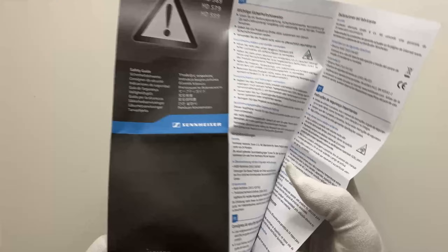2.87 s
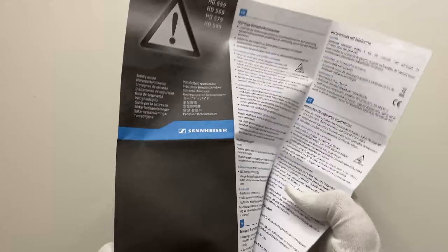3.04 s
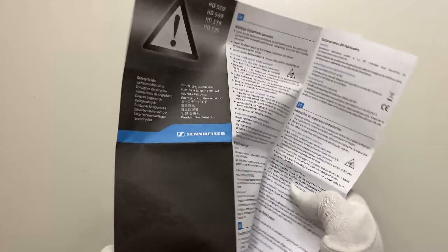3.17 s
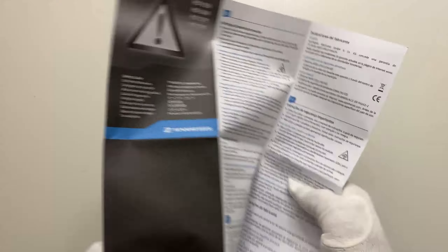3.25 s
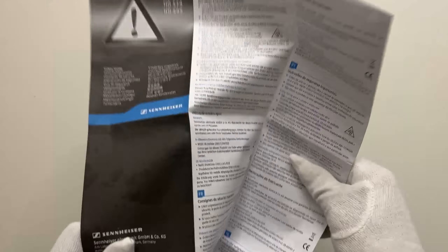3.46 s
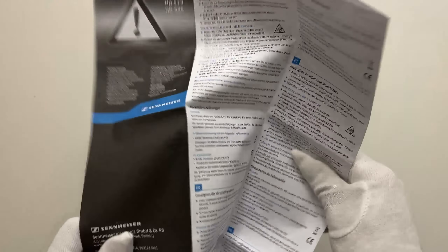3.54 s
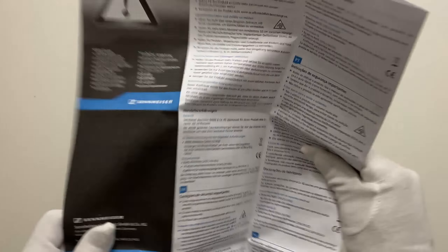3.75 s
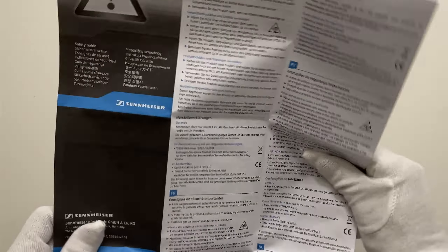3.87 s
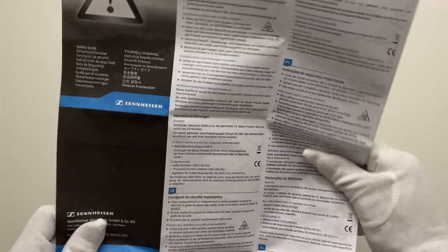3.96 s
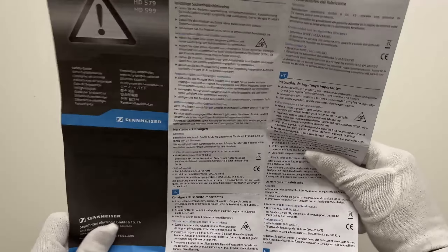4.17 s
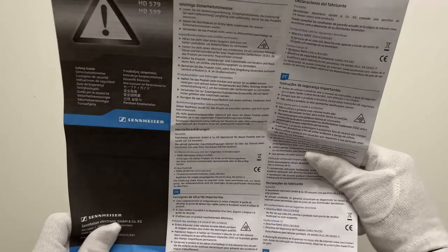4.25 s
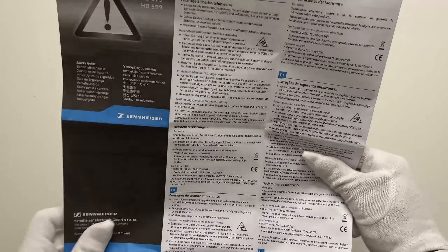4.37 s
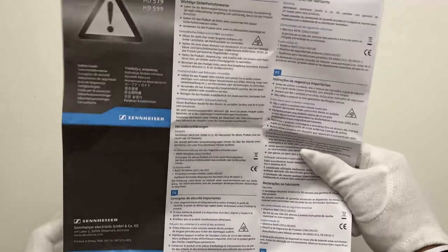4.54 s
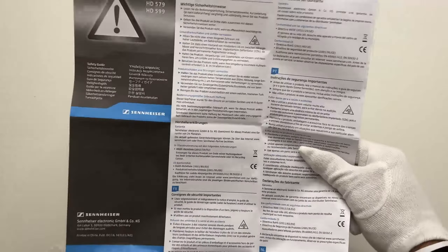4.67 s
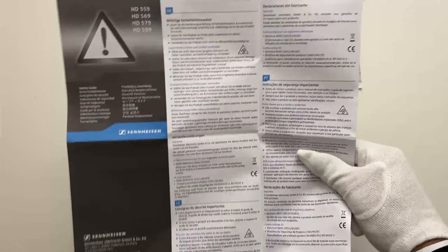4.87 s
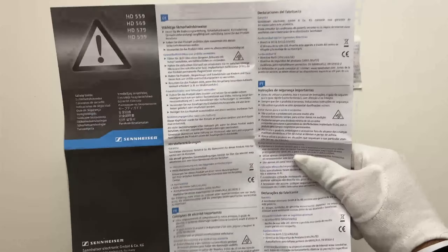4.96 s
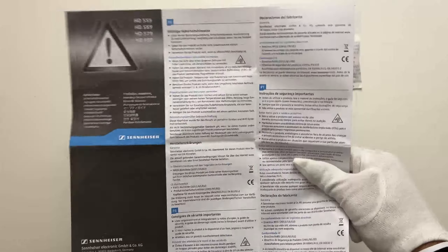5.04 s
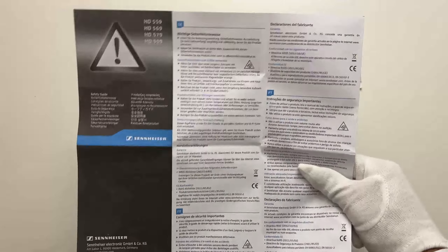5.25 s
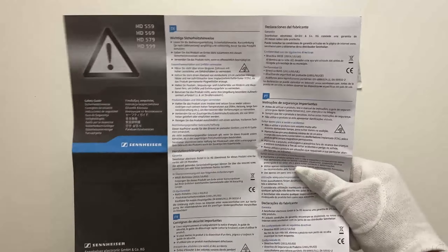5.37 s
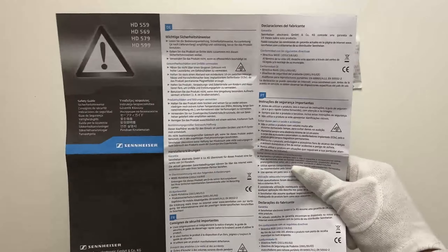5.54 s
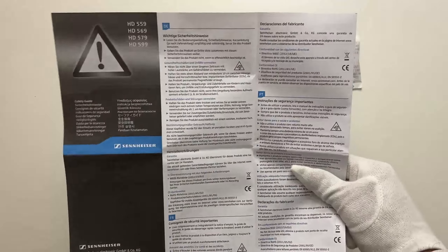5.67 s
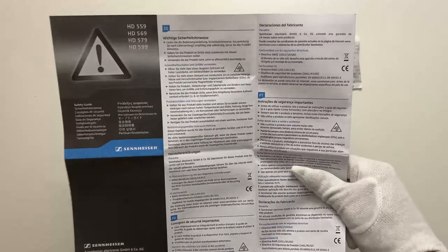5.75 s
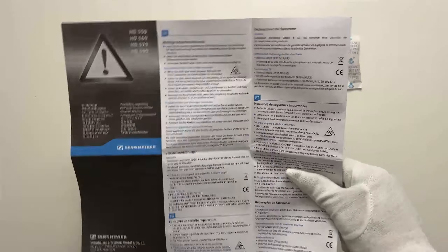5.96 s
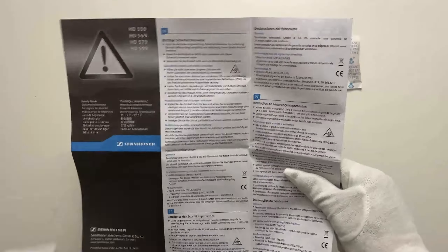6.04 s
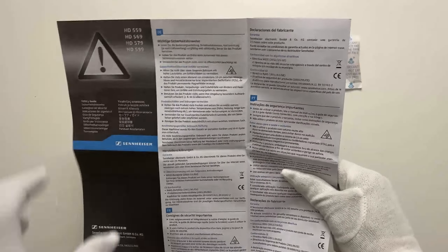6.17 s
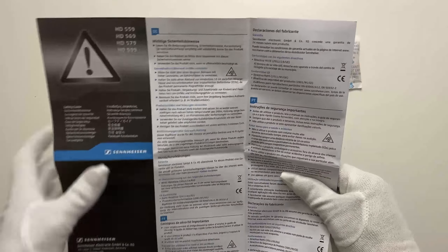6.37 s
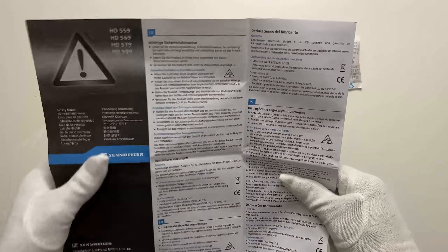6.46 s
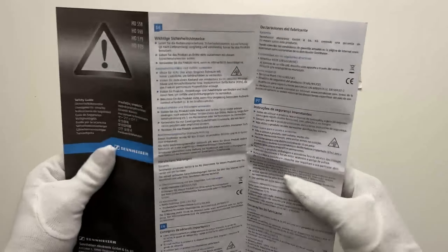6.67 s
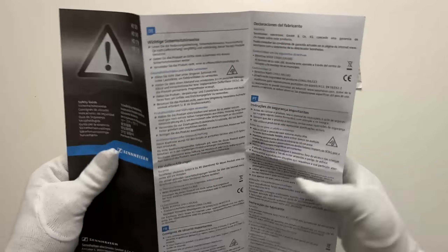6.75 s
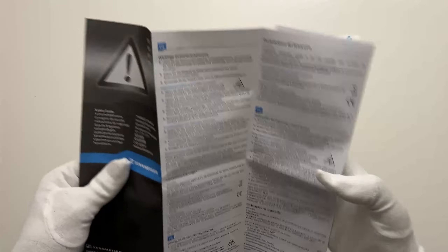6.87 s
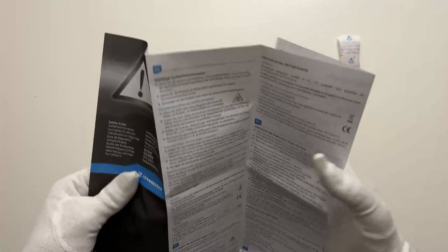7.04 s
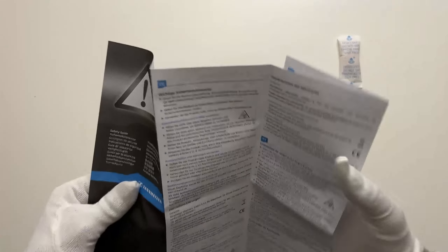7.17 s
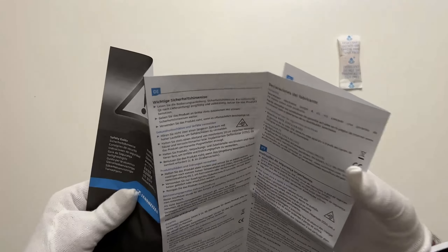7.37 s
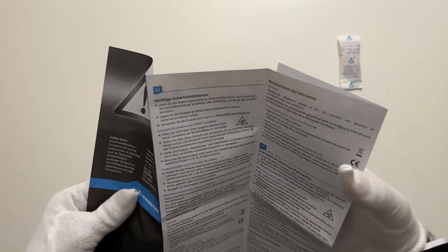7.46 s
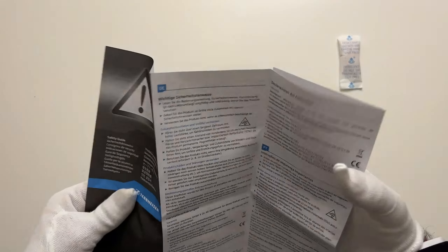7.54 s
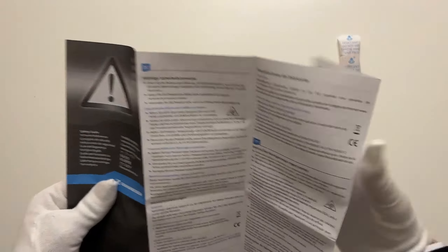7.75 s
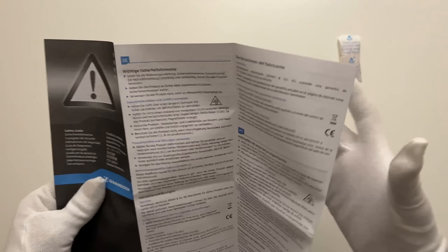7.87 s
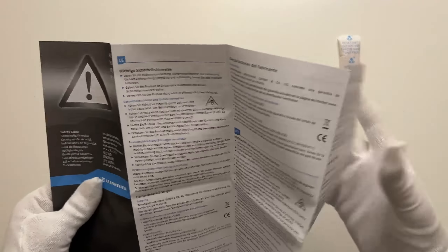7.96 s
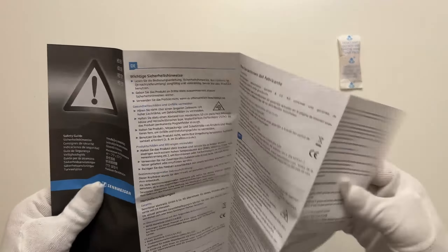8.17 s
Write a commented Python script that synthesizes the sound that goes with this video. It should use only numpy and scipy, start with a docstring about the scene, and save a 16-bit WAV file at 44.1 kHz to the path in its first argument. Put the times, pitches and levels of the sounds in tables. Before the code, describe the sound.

A folded paper leaflet is opened by gloved hands, close to the microphone in a quiet room. It starts with a quick burst of crisp crease snaps, followed by lighter crackling, flapping and the hiss of cotton fingertips, with sharper snaps around 0.9, 1.7 and 2.6 seconds. From about 3 to 5 seconds the paper crinkles densely, loudest near 3.7 seconds, each snap carrying a papery knock and a bright crack. The handling then thins out, with small rustles near 5.8 and 6.5 seconds, soft thumps of the bending sheet around 7 seconds and a brief lull. Crackling returns at 7.6 seconds and swells into a loud run of snaps from 8.3 to 8.9 seconds, with a few more around 9.5 seconds. Slight room reverberation follows the snaps, and a faint low hum continues throughout.

```python
"""A folded paper leaflet is opened by gloved hands, close up in a quiet room.
Its creases snap in volleys of tiny buckles, each with a papery knock, a bright crack and a drumming
of the sheet. Between snaps the paper crackles and flaps, cotton fingertips hiss across it and soft
pushes make it thump. The room answers the snaps and hums faintly underneath."""
import sys
import numpy as np
from scipy import signal
from scipy.fft import rfft, irfft, next_fast_len
from scipy.io import wavfile
from scipy.ndimage import uniform_filter1d, map_coordinates

SR = 44100
rng = np.random.default_rng(int(sys.argv[2]) if len(sys.argv) > 2 else 0)


def pcm_store(signal):
    """Save signal as 16-bit PCM."""
    levels = np.round(np.clip(np.atleast_2d(signal), -1, 1) * 32767)
    wavfile.write(sys.argv[1], SR, levels.astype(np.int16).T)


N = 428211


def amp(db):
    return 10 ** (np.asarray(db) / 20)


def unit_rms(x):
    return x / np.sqrt(np.mean(x ** 2, axis=-1, keepdims=True) + 1e-20)


def unit_peak(x):
    return x / (np.abs(x).max() + 1e-12)


def decay(t, t60):
    return amp(-60 * t / t60)


def attack(t, rise_s):
    return (1 - np.exp(-t / rise_s)) ** 2


def along(points, hz):
    """Read a curve of (Hz, value) points on a log frequency axis."""
    knots_hz, values = np.transpose(points)
    return np.interp(np.log(hz + 1), np.log(knots_hz + 1), values)


def filtered(x, response):
    """Pass x through a complex frequency response."""
    n = x.shape[-1]
    padded = next_fast_len(n + 4096)
    return irfft(rfft(x, padded) * response(np.fft.rfftfreq(padded, 1 / SR)), padded)[..., :n]


def eq(points):
    """The response of a (Hz, dB) curve."""
    return lambda hz: amp(along(points, hz))


def resonance(hz, centre_hz, width_hz):
    return 1j * hz * width_hz / (centre_hz ** 2 - hz ** 2 + 1j * hz * width_hz)


def lowpass(hz, corner_hz):
    return 1 / (1 + 1j * hz / corner_hz)


def wobble(rate):
    """A smooth random curve with `rate` knots a second."""
    return map_coordinates(rng.standard_normal(int(N * rate / SR) + 4), [np.arange(N) * rate / SR])


def patchy_noise(depth_db):
    """Noise whose colour drifts in random patches of time and pitch."""
    spectrum = signal.stft(rng.standard_normal(N), nperseg=512)[2]
    patches = uniform_filter1d(rng.standard_normal(spectrum.shape), size=20, axis=0)
    patches = uniform_filter1d(patches, size=12, axis=1)
    return signal.istft(spectrum * amp(depth_db * patches / patches.std()), nperseg=512)[1][:N]


# Dark bed of room air: (frequency [Hz], gain [dB])
AIR_EQ = [(15, -28), (33, -4.5), (48, 13.5), (146, 6.5), (252, 2), (445, -7.5), (750, -16), (1200, -24),
          (2460, -17.5), (5130, -27.5), (6380, -23.5), (11600, -48.5), (13300, -54), (16500, -48.5)]
# Low hum bands: (pitch [Hz], resonance width [Hz], level [dB])
HUM_BANDS = [(47.7, 8.3, -67), (101, 17, -74), (145.76, 5.2, -67)]


def room_tone():
    """Faint air, with a hum that wavers because it is made of narrow bands of noise."""
    air = amp(-67) * unit_rms(filtered(rng.standard_normal((2, N)), eq(AIR_EQ)))
    for pitch_hz, width_hz, db in HUM_BANDS:
        hum = filtered(rng.standard_normal((2, N)), lambda hz: resonance(hz, pitch_hz, width_hz) ** 2)
        air += amp(db) * unit_rms(hum)
    return air


# Glove strokes: (time [s], hold [s], crackle level [dB], flap level [dB], hiss level [dB])
GLOVE_SLIDES = [(0.0, 0.031, -55, -52, -64), (0.023, 0.43, -84, -65, -61), (0.5, 0.085, -68, -67, -63),
                (0.814, 0.016, -61, -64, -64), (0.93, 0.086, -60, -54, -57.5),
                (1.05, 0.13, -66.5, -60.5, -56), (1.311, 0.1, -58, -57.5, -59),
                (1.51, 0.1, -58, -66, -60.5), (1.62, 0.09, -53, -57, -68), (1.731, 0.013, -68, -56, -44),
                (2.114, 0.098, -70, -61, -64.5), (2.312, 0.11, -78, -58, -60.5),
                (2.76, 0.033, -61, -57.5, -74), (3.047, 0.07, -72, -76, -66.5),
                (3.147, 0.11, -53, -60, -59.5), (3.338, 0.31, -66, -62.5, -61.5),
                (3.6, 0.023, -44, -72, -61), (3.68, .04, -40.5, -44, -60), (3.753, 0.035, -45, -55, -67.5),
                (3.847, 0.019, -45.5, -63, -57.5), (4.01, 0.033, -55, -50, -53.5),
                (4.277, 0.32, -66, -72, -62.5), (4.752, 0.027, -58, -60, -51),
                (4.902, 0.12, -48.5, -56, -53), (5.164, 0.066, -60.5, -75, -62.5),
                (5.693, 0.048, -63.5, -63, -64.5), (5.921, 0.22, -70.5, -68, -70),
                (6.377, 0.17, -74, -73.5, -73), (6.545, 0.097, -49.5, -55, -64),
                (6.7, 0.051, -61, -60, -65.5), (6.909, 0.17, -67.5, -61, -74.5),
                (7.15, 0.029, -77.5, -76, -70.5), (7.41, .02, -89.5, -81, -80), (7.48, .03, -89, -85, -76),
                (7.544, 0.033, -82, -71, -57.5), (7.59, 0.086, -56.5, -59, -56.5),
                (7.9, 0.19, -63.5, -60.5, -77), (8.147, 0.02, -61, -61, -61),
                (8.35, 0.047, -41.5, -39.5, -49), (8.416, 0.026, -38.5, -45, -66),
                (8.478, 0.018, -49, -52, -42), (8.764, 0.16, -53, -57.5, -58.5),
                (9.076, 0.2, -66.5, -60, -64), (9.364, 0.16, -60.5, -57, -60),
                (9.613, .1, -61, -64.5, -57.5)]


def glove_slides():
    """Power envelopes of crackle, flap and hiss: each stroke over the sheet swells, holds and fades."""
    rise_db_per_s, fall_db_per_s = 248.5, 96.5
    t = np.arange(0, N, 64) / SR
    start, hold, *levels_db = np.transpose(GLOVE_SLIDES)[:, :, None]
    fade_in_db = np.minimum(rise_db_per_s * (t - start), 0)
    fade_out_db = np.minimum(fall_db_per_s * (start + hold - t), 0)
    powers = [amp(2 * (db + fade_in_db + fade_out_db)).sum(axis=0) for db in levels_db]
    return [np.interp(np.arange(N) / SR, t, power) for power in powers]


# Dry midrange crackle of the paper: (frequency [Hz], gain [dB])
CRACKLE_EQ = [(290, -34), (500, 0), (850, 8), (914, 4), (1130, 5.5), (1590, 1.5), (1800, 3), (6000, -7.5),
              (7800, -15.5), (13200, -120)]
# Low flutter of the sheet: (frequency [Hz], gain [dB])
FLAP_EQ = [(35, -70), (60, -1), (110, -2), (174, -5), (347, 1.5), (391, -3), (427, -0.5), (800, -15),
           (1040, -41.5), (1760, -120)]
# Airy rub of cotton on paper: (frequency [Hz], gain [dB])
HISS_EQ = [(2000, -11), (3500, -9), (4250, -7), (5100, -15), (5500, -6.5), (7200, -7.5), (9700, -14),
           (12200, -17), (16500, -24.5)]


def paper_rustle():
    """Sliding or settling, the sheet crackles in clumps, flaps, and hisses under the fingertips."""
    clumps = wobble(30)
    buckles = amp(clumps + 3 * wobble(160) + 1.8 * wobble(700))
    crackle = filtered(buckles * patchy_noise(depth_db=2), eq(CRACKLE_EQ))
    flutter = amp(1.8 * clumps + 2.1 * wobble(18))
    flap = flutter * filtered(rng.standard_normal(N), eq(FLAP_EQ))
    uneven_rub = amp(1.5 * wobble(22) + 1.2 * wobble(200))
    hiss = uneven_rub * filtered(patchy_noise(depth_db=1.5), eq(HISS_EQ))
    layers = zip([crackle, flap, hiss], glove_slides(), sheet_settling())
    return sum(np.sqrt(slide + settle) * unit_rms(layer) for layer, slide, settle in layers)


def crease_knock(volley, impulse, knock_hz, rasp_db):
    """The patch around a crease knocks, rasps and rings. Returns that and a smooth-toned click."""
    bend_s = 0.000993  # bending-wave delay at 1 kHz; lower pitches arrive later
    knock = lambda hz: resonance(hz, knock_hz, 0.39 * knock_hz) ** 2

    def rasp(hz):
        return amp(rasp_db) * (resonance(hz, 0.92 * knock_hz, 2.39 * knock_hz) * lowpass(hz, 6000)) ** 2

    def patch(hz):
        bend = np.exp(-4j * np.pi * bend_s * np.sqrt(1000 * hz))
        late = np.exp(-2j * np.pi * hz * 0.00193)  # the wider patch answers late and hollow
        hollow = 0.22 * resonance(hz, 0.535 * knock_hz, 0.21 * knock_hz) ** 2 * late
        ring = amp(-5.5) * resonance(hz, knock_hz, 0.06 * knock_hz) * lowpass(hz, knock_hz)
        return bend * (knock(hz) * lowpass(hz, 3 * knock_hz) + rasp(hz) + hollow + ring)

    return filtered(volley, patch), filtered(impulse, lambda hz: knock(hz) + rasp(hz))


# Bright edge of a snap: (frequency [Hz], gain [dB])
CRACK_EQ = [(2500, -31), (4000, -22), (5200, -7), (6000, 14), (7800, 9.5), (9600, -3), (12000, -2),
            (14000, -0.5), (16500, 1)]


def crease_crack(volley, t, peak_hz, crack_db):
    """The treble of a snap dies first; a stronger crack carries more of the very top."""
    def edge(hz):
        top_db = crack_db * (hz > 9800)
        return amp(along(CRACK_EQ, hz) + top_db) * (1 + resonance(hz, peak_hz, 3200))

    return filtered(volley * attack(t, 0.00043) * decay(t, t60=0.0069), edge)


# Drum modes of the sheet: (pitch [Hz], width [Hz], gain [dB])
SHEET_MODES = [(348, 21, 2), (434.4, 21, 2), (585, 165, -3.5), (231, 57, -8), (117, 100, -10.5)]


def sheet_drum(hz):
    """Response of the whole panel: low modes of alternating polarity that shed little treble."""
    modes = sum((-1) ** k * amp(db) * resonance(hz, pitch_hz, width_hz)
                for k, (pitch_hz, width_hz, db) in enumerate(SHEET_MODES))
    return modes * lowpass(hz, 1500) ** 2


# Crease hits: (time [s], body level [dB], drum over body [dB], crack over body [dB],
# rasp over knock [dB], knock pitch [Hz], volley t60 [s])
CREASE_SNAPS = [(0.028, -24.5, -8, -5.5, 0.5, 1100, 0.074), (0.086, -23.5, -16, -8, -13.5, 1660, 0.0098),
                (0.194, -25.5, -8, -4.5, 19, 1410, 0.028), (0.275, -25, -16, -24, 9, 1490, 0.027),
                (0.278, -26, -2, -34.5, 0.5, 760, 0.03), (0.531, -37, -7, -20, -12, 1050, 0.041),
                (0.568, -54.5, 4.5, -20, -8, 1000, 0.029), (0.615, -45.5, -5, -22, 3, 1620, 0.042),
                (0.665, -51, -3, -23, -3, 1310, 0.015), (0.736, -43, -5.5, -29, 2, 930, 0.17),
                (0.84, -46, -15, -25, -5, 1070, .04), (0.918, -30, -13, -4.5, 2, 1350, 0.032),
                (1.048, -55, -9, -25, -8, 1000, .03), (1.138, -51, 0, -30, -14.5, 950, 0.047),
                (1.27, -45.5, -7, -18.5, -15, 914, 0.013), (1.325, -45.5, -3, -22.5, -17, 1630, 0.029),
                (1.368, -36, -12, -27.5, -2, 950, 0.026), (1.535, -48.5, -14, -19, -3, 1600, 0.027),
                (1.564, -43, -21, -13, 1.5, 1750, 0.034), (1.626, -29.5, -14.5, -7.5, 2, 1830, 0.038),
                (1.639, -29, -8, -12, -8, 1740, 0.051), (1.703, -19, -39, -7, 9, 4130, 0.0067),
                (1.743, -22, -51, -26, -3, 1510, 0.014), (1.931, -43.5, -3.5, -17, -13, 1230, 0.019),
                (2.066, -42, -6, -4, 16, 890, 0.072), (2.094, -45.5, -3, -27, 3, 1050, 0.03),
                (2.137, -29.5, -17.5, -35, -4, 2110, 0.0078), (2.237, -27, -16.5, -46, -6, 1670, 0.0097),
                (2.254, -31.5, -5.5, -26, -29, 1840, 0.02), (2.266, -39, 2, -25, -25, 1830, 0.031),
                (2.294, -34, -11, -25, -14, 1160, 0.029), (2.355, -39.5, -2, -30, -17, 1150, 0.051),
                (2.364, -33, -17, -32, -14, 1190, 0.033), (2.414, -43, 7, -30, -9, 1040, 0.028),
                (2.427, -40.5, -2, -30, -28, 1150, 0.037), (2.641, -27, -7.5, -9.5, 12, 1120, 0.039),
                (2.8, -34.5, -7.5, -31, -4, 1660, 0.035), (2.895, -38, -11.5, -32, -17, 1300, 0.05),
                (3.123, -37, -11.5, -6.5, 7.5, 2000, 0.014), (3.129, -26, -8, 7, 16, 2460, 0.023),
                (3.144, -30.5, -8, -9, 3, 1150, 0.058), (3.149, -28.5, -21, -2.5, -1.5, 1990, 0.011),
                (3.157, -25.5, -16, -11, 12, 1280, 0.047), (3.267, -34.5, -2.5, -26.5, -3, 1280, 0.038),
                (3.296, -42, -6, -27, -10, 997, 0.033), (3.334, -30, -9, -27.5, -16.5, 1100, 0.038),
                (3.359, -42, 2.5, -29, -13.5, 1200, 0.04), (3.378, -44, 1, -30.5, -17, 1060, 0.017),
                (3.563, -18, -9, -12.5, 7, 2150, 0.034), (3.588, -23.5, -32.5, -1.5, 7, 1300, 0.023),
                (3.605, -32.5, -17, -22, 2, 2000, 0.025), (3.646, -13, -12.5, -11, 1, 2120, 0.0087),
                (3.660, -13.5, -21, -24.5, 2, 2280, 0.028), (3.687, -30.5, -12, -21.5, 3, 1700, 0.01),
                (3.719, -38.5, -20, 1, 1, 1990, .01), (3.728, -20.5, -14, 3, 2, 2750, 0.027),
                (3.786, -29, -8, -27, -9.5, 1100, .015), (3.825, -25.5, -21, -18, -11, 1117, 0.013),
                (3.850, -23.5, -10.5, -32.5, 29, 1400, 0.096), (3.876, -28.5, -19, -33, -6, 1280, 0.011),
                (4, -32, -7, -24, -7, 1200, 0.057), (3.99, -39.5, -1, -32, -8, 1800, 0.019),
                (4.015, -15.5, -16.5, -24, 14, 1940, 0.019), (4.027, -32, -10, -25, -16, 1250, .03),
                (4.04, -35, -3, -23, -25, 1210, 0.01), (4.059, -36, -2, -20, -16, 1290, 0.021),
                (4.087, -29, -11, -18.5, 1, 1320, 0.11), (4.099, -37.5, -10, -29, -7, 2200, 0.015),
                (4.141, -42, 0.5, -13, -21, 1480, 0.037), (4.181, -44, 0, -33, -27, 1230, 0.025),
                (4.324, -27.5, -12.5, -4.5, 2, 2250, 0.032), (4.44, -47.5, 5.5, -21, -17, 1260, 0.0087),
                (4.587, -47.5, 0, -19.5, -10, 825, 0.033), (4.721, -43, -1, -28.5, -14, 930, 0.038),
                (4.726, -36.5, -7, -26, 3, 1490, 0.034), (4.735, -52, -5, -14.5, 9, 2000, 0.034),
                (4.881, -28, -16.5, -8, 0, 1990, .02), (4.884, -18.5, -18, -23, 9, 2300, 0.031),
                (4.946, -38.5, -5.5, -20, -6, 1210, .015), (4.966, -38, 2, -29.5, -12, 795, 0.049),
                (4.978, -45.5, -1, -19, -1, 1000, .03), (5, -39, -5, -22, -6, 1800, 0.014),
                (5.015, -33, -2, -5.5, 6, 1430, 0.036), (5.028, -30.5, -3.5, -21, 5, 1210, 0.018),
                (5.040, -28, -12, -26, 6, 1380, 0.032), (5.226, -45.5, -2.5, -13, -3, 875, 0.11),
                (5.518, -68, 9.5, -10.5, -4, 933, 0.029), (5.587, -67, 15, -28, -12, 880, 0.03),
                (5.75, -40, -6.5, -30, -3, 1440, .038), (5.787, -39, -30, -25, -11, 805, 0.069),
                (5.811, -32, -11, -28, 1, 1490, 0.05), (5.954, -53, 3, -20.5, -10, 864, 0.066),
                (6.515, -30, -8, -20.5, 12, 1700, 0.087), (6.568, -30.5, -5, -31, -26, 1410, 0.042),
                (6.577, -30.5, -8, -33, 4, 1460, 0.06), (6.630, -29.5, -7, -6, -7, 1460, 0.014),
                (6.644, -36, -12, -31, -24, 1330, 0.02), (6.663, -54, -16, -29.5, -10, 1600, 0.013),
                (6.714, -44.5, 3, -33, -12, 1090, .03), (6.787, -53, -4, -24.5, -2, 2480, 0.013),
                (6.795, -39, -0.5, -16, -20, 2200, 0.03), (6.908, -54, -7, -27, -6, 2500, .02),
                (7.021, -46, 4, -26, -2, 1480, 0.018), (7.585, -34, -10, -36, 14, 1320, 0.045),
                (7.598, -35, -21, -22, 5, 2340, 0.11), (7.684, -32.5, -5.5, -25, -2, 1520, 0.041),
                (7.693, -27, -10.5, -32, 19, 1880, 0.096), (7.894, -42.5, -8, -30, -3, 1270, 0.018),
                (7.925, -55, 6, -31, -4, 890, 0.036), (7.973, -39, -3.5, -28, -4, 1690, 0.049),
                (8.053, -41, -34, -25, -14, 1940, 0.034), (8.193, -47, 0, -30, -28, 1700, 0.033),
                (8.244, -52, -12, -30, -22, 2470, 0.018), (8.275, -48, -11, -30, -16, 2000, 0.018),
                (8.312, -43, 10, -35, -14, 700, 0.0097), (8.327, -25, -18, -28, 8, 1450, 0.073),
                (8.330, -15.5, -21, -4.5, 8, 2720, 0.03), (8.339, -29, -14, -25, -2, 1500, .03),
                (8.361, -38.5, 3, -31, -4, 1400, 0.051), (8.413, -27.5, -4, 6.5, -8, 1250, 0.022),
                (8.424, -23.5, -22, -12.5, 3, 1810, 0.036), (8.456, -15.5, -26, 3, 6, 1920, 0.027),
                (8.473, -21.5, -7.5, -36, -2, 1380, 0.013), (8.487, -25.5, -19, -10, 10, 2500, 0.037),
                (8.502, -29, -11, -20, 3, 2200, .025), (8.643, -42.5, -2, -16, 1, 1150, 0.023),
                (8.709, -41, 7, -29, -4, 815, 0.065), (8.72, -32.5, -11, -29, -4, 1020, 0.058),
                (8.732, -30.5, -13, -23, 9, 1070, 0.095), (8.748, -20.5, -12.5, -32, 5, 2020, 0.13),
                (8.766, -21.5, -33, -6.5, -2, 1180, 0.044), (8.887, -27, -13.5, -8, -10, 1180, 0.04),
                (8.919, -32.5, -7, -23, 8, 1290, 0.04), (9.136, -40.5, -2.5, -23, 0, 1000, 0.17),
                (9.233, -46.5, -4, -27, -20, 1080, 0.03), (9.412, -44.5, -5, -25, -26, 1080, 0.17),
                (9.440, -25.5, -11.5, -7, 3, 3520, 0.03), (9.474, -34, -18, -9, 1, 1110, 0.11),
                (9.513, -41.5, -14, -28, -5, 1090, 0.044), (9.624, -27, -11.5, -1.5, -9, 1440, 0.012)]


def crease_snaps():
    """Each crease pops and gives way in tiny buckles. Returns direct sound, left lean and room send."""
    size = 3584
    t = np.arange(size) / SR
    impulse = decay(t, t60=1 / SR)
    smooth_crack = filtered(np.roll(impulse, 200), eq(CRACK_EQ))
    smooth_drum = filtered(impulse, sheet_drum)
    out = np.zeros((3, N + size))
    for time_s, db, drum_db, crack_db, rasp_db, knock_hz, t60 in CREASE_SNAPS:
        crack_hz = rng.normal(6500, 980)
        lean = -0.5 * np.tanh(rng.normal(0, 0.0288))
        grit, clumps, shake = rng.standard_normal((3, size))
        dying = decay(t, t60)
        pop = 1 + 2.5 * decay(t, t60=0.0025)  # the first buckle is the largest
        volley = grit * amp(3.5 * unit_rms(uniform_filter1d(clumps, size=15))) * dying * pop
        body, smooth_body = crease_knock(volley * attack(t, 0.00046), impulse, knock_hz, rasp_db)
        crack = crease_crack(volley, t, crack_hz, crack_db)
        drum = filtered(shake * (dying * attack(t, 0.00059)) ** 0.44, sheet_drum)  # outlasts the volley
        parts = [unit_peak(body), amp(crack_db) * unit_peak(crack), amp(drum_db) * unit_peak(drum)]
        direct = sum(parts)
        # summed over all directions, each part has the same energy but a smooth colour
        smooth_parts = [smooth_body, smooth_crack, smooth_drum]
        send = sum(unit_rms(smooth) * np.std(part) for smooth, part in zip(smooth_parts, parts))
        out[:, round(time_s * SR):][:, :size] += amp(db) * np.array([direct, lean * direct, send])
    return out[:, :N]


def sheet_settling():
    """Power envelopes of crackle, flap and hiss: the energy of each snap builds briefly, then drains."""
    time_s, db, drum_db, crack_db = np.transpose(CREASE_SNAPS)[:4]
    swell_s = 0.0041
    swell = np.exp(-1 / (swell_s * SR))

    def settle(level_db, t60):
        kicks = np.bincount(np.round(time_s * SR).astype(int), amp(2 * level_db), N)
        retained = decay(1 / SR, t60) ** 2
        draining = signal.lfilter([1], [1, -retained], kicks)
        onset = signal.lfilter([1], [1, -retained * swell], kicks)
        return np.abs(draining - onset)

    crackle = settle(db - 27, t60=0.68)
    flap = settle(db + drum_db - 22, t60=0.9)
    hiss = settle(db + crack_db - 28.5, t60=0.68)
    return crackle, flap, hiss


# Soft thumps as the hands bow the sheet: (time [s], level before the band-pass [dB], pitch [Hz])
HAND_PUSHES = [(0.028, -42, 370), (0.111, -38, 133), (0.140, -45, 201), (0.166, -38, 120),
               (0.919, -37.5, 154), (1.631, -48, 218), (1.658, -43, 75), (2.061, -40.5, 115),
               (2.365, -40, 78.5), (2.41, -40, 347), (3.141, -49, 312), (3.152, -39, 65), (3.159, -48, 109),
               (3.331, -35, 381), (3.561, -25, 369), (3.641, -42, 360), (3.98, -52, 363), (4.322, -40, 399),
               (5.009, -37, 354), (6.537, -51.5, 134), (6.603, -48, 80), (6.908, -39, 323),
               (6.978, -36, 315), (7.021, -34.5, 301), (7.002, -41, 78.4), (7.07, -44, 300),
               (7.11, -49, 296), (7.23, -50, 316), (8.346, -41, 350), (8.399, -29, 298),
               (8.712, -33.5, 244), (9.352, -45, 336)]


def hand_pushes():
    """A soft push sets one low mode of the sheet swinging, a little unsteadily."""
    t = np.arange(SR // 4) / SR
    envelope = decay(t, t60=0.1) * (1 - np.exp(-t / 0.00084))
    out = np.zeros(N + SR)
    for time_s, db, pitch_hz in HAND_PUSHES:
        drift = np.cumsum(rng.standard_normal(len(t))) * 0.068
        swing = np.sin(2 * np.pi * pitch_hz * t + drift) * envelope
        out[round(time_s * SR):][:len(t)] += amp(db) * unit_peak(swing)
    return filtered(out[:N], lambda hz: resonance(hz, 130, 330) ** 2)


# Reverb decay: (frequency [Hz], t60 [s])
ROOM_DECAY = [(150, 1), (500, 0.9), (2500, 0.81), (8000, 0.75), (16000, 0.094)]


def room_tail():
    """Two unrelated reverb tails; each frequency dies at its own speed."""
    hz, t, spectrum = signal.stft(rng.standard_normal((2, SR // 2)), SR, nperseg=256)
    tails = signal.istft(spectrum * decay(t, along(ROOM_DECAY, hz)[:, None]), SR, nperseg=256)[1]
    return tails / np.linalg.norm(tails[0])


# Tone of the reverb return: (frequency [Hz], gain [dB])
REVERB_EQ = [(150, -15), (1000, -13.5), (4000, -7.5), (12000, -16)]


def room_reverb(send):
    """The sheet moves, so every quarter second meets the walls with a fresh tail."""
    step, predelay_samples = SR // 4, 250
    out = np.zeros((2, N + 2 * SR))
    for start in range(0, N, step):
        answer = signal.fftconvolve(send[None, start:start + step], room_tail(), axes=1)
        out[:, start + predelay_samples:][:, :answer.shape[1]] += answer
    return filtered(out[:, :N], eq(REVERB_EQ))


# Stereo width, left minus right: (frequency [Hz], gain [dB])
SIDE_EQ = [(60, -33), (140, -19.5), (330, -12), (770, -5), (1300, -10), (1900, -18), (2700, -7.5),
           (4800, -6), (5800, -5.5), (6800, -44), (8000, -3.5), (10500, -0.5), (12000, 8), (15700, 5.5),
           (16200, -6)]
# Phase turn of close sound in the side channel: (frequency [Hz], phase [rad])
SIDE_PHASE = [(100, 3.4), (500, 2.48), (1500, 1.8), (4000, 1.47), (7000, 1.5), (12000, 1.6)]
# Steep roll-off above 12 kHz in the centre of the rustle, thumps and room: (frequency [Hz], gain [dB])
MID_EQ = [(12200, -3), (13000, -23.5), (16500, -50.5)]
# Gentler treble roll-off in the centre of the snaps: (frequency [Hz], gain [dB])
MID_SNAP_EQ = [(12500, -1.5), (14000, -16), (16500, -19.5)]


def scene():
    """Mid/side mix: close paper reaches both channels with a phase turn; the room differs freely."""
    snaps, lean, send = crease_snaps()
    handling = hand_pushes() + paper_rustle()
    room_mid, room_side = room_reverb(send) + room_tone()
    close_side = filtered(snaps + handling, lambda hz: np.exp(1j * along(SIDE_PHASE, hz)))
    side = filtered(amp(-2.5) * close_side + amp(3.0) * room_side, eq(SIDE_EQ)) + lean
    mid = filtered(handling + room_mid, eq(MID_EQ)) + filtered(snaps, eq(MID_SNAP_EQ))
    return np.array([mid + side, mid - side])


def record(dry):
    """A brick-wall high cut that removes everything above 16.65 kHz."""
    return filtered(dry, lambda hz: hz < 16650)


dry = scene()
out = record(dry)
pcm_store(out)
```